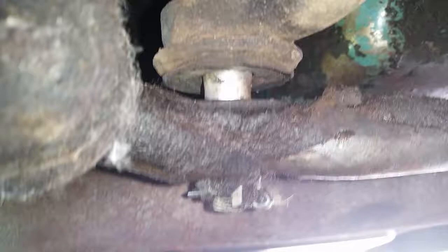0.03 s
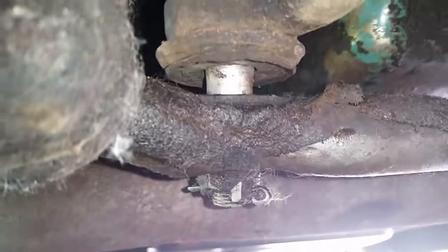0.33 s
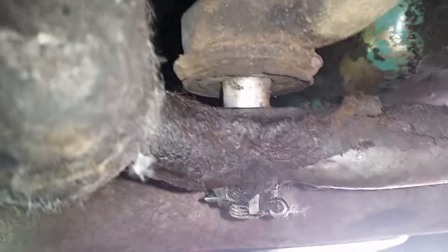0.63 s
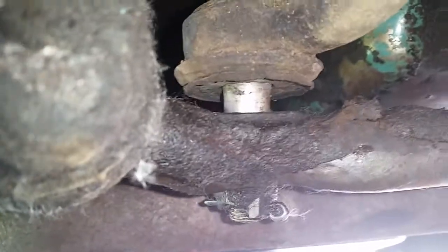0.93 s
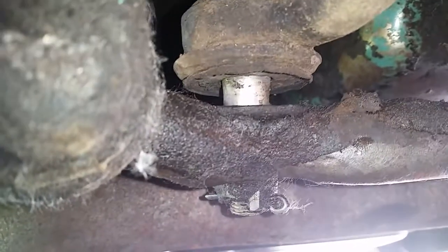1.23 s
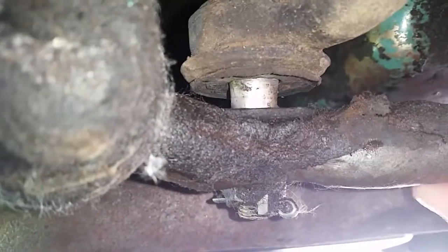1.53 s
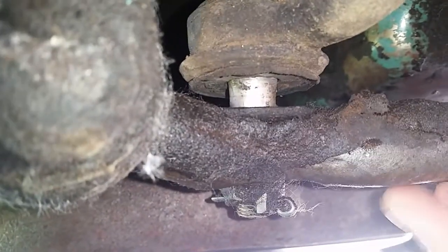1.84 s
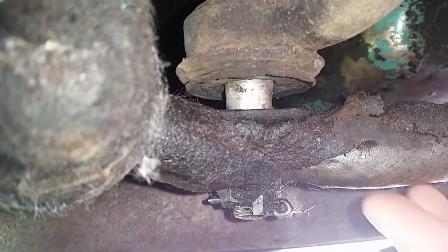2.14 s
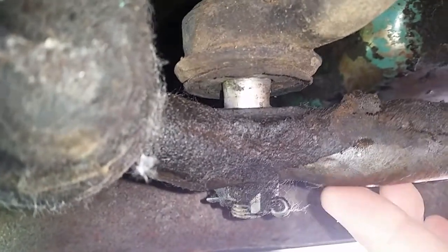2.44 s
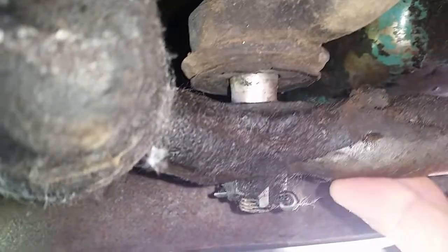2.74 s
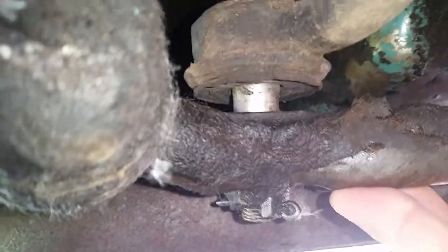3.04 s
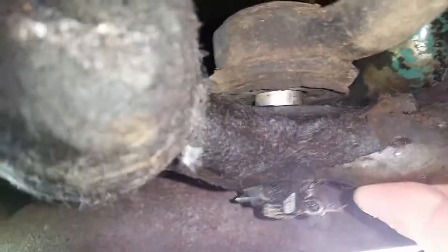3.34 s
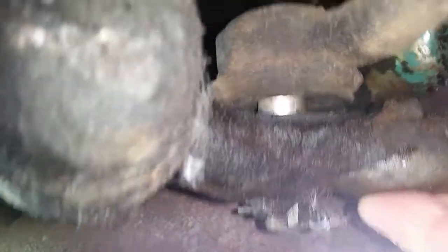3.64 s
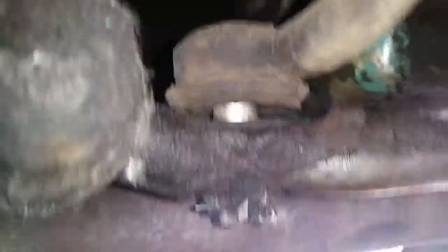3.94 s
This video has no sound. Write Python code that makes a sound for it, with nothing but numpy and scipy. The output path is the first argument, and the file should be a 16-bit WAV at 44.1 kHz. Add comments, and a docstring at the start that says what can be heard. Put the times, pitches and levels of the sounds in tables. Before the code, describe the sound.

A worn metal joint clicks and clunks under a car, with bumps of microphone handling.

```python
"""Under a car, a faint low rumble and hiss fade in. The hand holding the camera rubs, bumps and then
creaks by the left microphone. With a faint rustle and scuffs of grit, a hand reaches in and pushes a worn
steering ball joint. At about 3 s the joint clicks free, then drops into its socket with a clunk: the
impacts excite the modes of the steel, reverberate under the body and set the suspension arm shuddering.
A few lighter knocks and scuffs follow."""
import sys
import numpy as np
from scipy import signal
from scipy.fft import irfft
from scipy.io import wavfile
from scipy.ndimage import uniform_filter1d

SR = 44100
rng = np.random.default_rng(int(sys.argv[2]) if len(sys.argv) > 2 else 0)


def transcribe(u):
    """Save the signal u as a 16-bit wav file named by the first command-line argument.

    u: samples, shape (n,) or (channels, n), limited to [-1, 1]; the rate is SR.
    q: integer samples, one column per channel.
    """
    v = np.clip(np.atleast_2d(u).T, -1, 1)
    q = np.round(v * 32767).astype(np.int16)
    wavfile.write(sys.argv[1], SR, q)


N = 176400
TIME = np.arange(N) / SR


def amp(db):
    """Amplitude ratio of a level in decibels."""
    return 10 ** (np.asarray(db) / 20)


def unit(x):
    """Normalisation to an rms of 1."""
    return x / np.sqrt(np.mean(x ** 2) + 1e-20)


def at_frequency(points, hz):
    """Interpolation of a table on a logarithmic frequency axis."""
    f, value = np.transpose(points)
    return np.interp(np.log(hz + 1), np.log(f + 1), value)


def envelope(points):
    """Amplitude envelope from levels interpolated in decibels."""
    return amp(np.interp(TIME, *np.transpose(points)))


def decay(t, t60):
    """Exponential damping: a fall of 60 dB in t60 seconds."""
    return amp(-60 * t / t60)


def add(mix, start, sound):
    """Superposition of a sound on the mix, from a start in seconds."""
    part = mix[:, round(start * SR):][:, :sound.shape[-1]]
    part += sound[..., :part.shape[-1]]


def noise(spectrum, size=N):
    """Partially coherent noise: the two microphones receive nearly the same bass but unrelated treble."""
    # likeness of the two microphones: f/Hz, correlation (0-1)
    coherence = [(30, 0.4), (70, 0.92), (140, 0.98), (290, 0.64), (640, 0.17), (1400, 0), (15000, 0)]
    hz = np.fft.rfftfreq(size, 1 / SR)
    left, independent = np.exp(2j * np.pi * rng.random((2, len(hz))))
    same = at_frequency(coherence, hz)
    right = same * left + np.sqrt(1 - same ** 2) * independent
    return unit(irfft(np.array([left, right]) * amp(at_frequency(spectrum, hz)), size))


def background():
    """Broadband noise: a low rumble and a faint hiss, with a narrow band of hiss near 4 kHz."""
    # spectra of the rumble and of the left and right hiss: f/Hz, relative density/dB
    rumble_spectrum = [(20, -18), (40, -9), (78, 1.5), (110, -9.5), (140, -2), (170, -13.5), (235, -19),
                       (275, -26), (330, -25.5), (450, -32.5), (700, -28.5), (1000, -33.5), (2000, -48.5),
                       (3500, -63.5), (8000, -90)]
    left_spectrum = [(1500, -2), (3400, 1), (4500, 1), (5200, -5.5), (6200, -24.5), (8000, -13.5),
                     (9500, -14.5), (12000, -0.5), (14500, 1.5)]
    right_spectrum = [(1500, -7.5), (3400, 2), (4500, 2.5), (5200, -2.5), (6200, -10.5), (8000, -6.5),
                      (9500, -14.5), (12000, -3.5), (14500, -1)]
    # rise of the whole background: t/s, gain/dB
    fade_in = [(0, -64.5), (.40, -61), (.435, -16), (.55, -5.5), (.68, 0.5), (1.6, 0.5), (2.3, -0.5),
               (3.2, 1), (3.7, 1.5), (4, 3.5)]
    band_hz, half_width_hz = 3940, 190
    hiss = np.array([amp(-71) * noise(left_spectrum)[0], amp(-73) * noise(right_spectrum)[0]])
    white = rng.standard_normal((2, N)) + 1j * rng.standard_normal((2, N))
    baseband = signal.lfilter(*signal.butter(2, half_width_hz, fs=SR), white)
    narrow_hiss = amp([[-75], [-85]]) * unit((baseband * np.exp(2j * np.pi * band_hz * TIME)).real)
    rumble = amp(-39.5) * noise(rumble_spectrum)
    return (rumble + hiss + narrow_hiss) * envelope(fade_in)


def hand_on_camera():
    """Structure-borne sound: friction noise and soft pressure pulses, mostly in the left microphone."""
    # spectrum of the rubbing: f/Hz, relative density/dB
    rub_spectrum = [(15, -6), (45, -0.5), (90, 5), (170, -3.5), (300, -20.5), (600, -44), (2000, -82.5)]
    # course of the rubbing: t/s, level/dB
    rub_levels = [(0, -100), (.5, -87.5), (.68, -36), (.92, -33), (1.12, -46.5), (1.62, -59.5),
                  (1.76, -16.5), (1.87, -43), (1.97, -37.5), (2.15, -63), (2.45, -51), (2.56, -34),
                  (2.8, -42), (2.93, -34.5), (3.12, -49), (3.6, -60.5), (3.76, -39), (4, -78)]
    # soft bumps of the hand: t/s, peak level/dB, width/s
    bumps = [(0.6973, -17.5, 0.0052), (0.7438, -22.5, 0.0056), (0.7763, -22, 0.011),
             (0.7953, -12.5, 0.0038), (.8263, -12, 0.0049), (0.8757, -25, 0.009), (0.9071, -20.5, 0.0028),
             (0.9138, -28.5, 0.0025), (0.935, -25, 0.0075), (1.028, -18.5, 0.0049), (1.7339, -13, .004),
             (1.7462, -8.5, .0047), (1.7584, -21, .0016), (1.763, -11.5, .0048), (1.7796, -22, .007),
             (1.7972, -18, .0056), (1.9356, -19, 0.0038), (1.9409, -23.5, 0.0027), (2.034, -27.5, 0.01),
             (2.3583, -16, 0.0037), (2.5165, -23, 0.0048), (2.6064, -22.5, 0.0054), (2.623, -24, 0.0072),
             (2.6566, -18.5, 0.0038), (2.7747, -22.5, 0.0064), (2.9084, -20, 0.006), (2.9208, -25.5, .004),
             (2.947, -18.5, 0.0049), (3.0093, -20, 0.0041), (3.0212, -14.5, 0.0047), (3.7342, -27, 0.0057),
             (3.775, -25, 0.0056)]
    out = noise(rub_spectrum)[0] * envelope(rub_levels)
    for centre, db, width in bumps:
        u_squared = np.minimum(((TIME - centre) / width) ** 2, 50)
        out -= amp(db) * (1 - 2 * u_squared) * np.exp(-u_squared)  # a trough between two crests
    return out * amp([[0], [-28.5]])


def grip_creak():
    """Stick-slip friction: each slip is one push and pull that rings the casing; weak slips are duller."""
    # slips of the grip: t/s, level/dB
    slips = [(1.7857, -28.5), (1.8982, -34), (1.9865, -32), (2.2016, -36), (2.8655, -36.5), (3.0003, -31.5),
             (3.083, -19.5), (3.1485, -25.5), (3.216, -27)]
    casing_hz, casing_t60, shortest_s = 640, 0.034, 0.00046
    out, strongest_db = np.zeros(N), max(db for _, db in slips)
    for start, db in slips:
        width = shortest_s * amp(0.16 * (strongest_db - db))  # weaker slips last longer
        u, t = (TIME - start) / width, np.clip(TIME - start, 0, 1)
        pulse = -2 * u * np.exp(-np.minimum(u ** 2, 50))
        ring = amp(-23) * np.sin(2 * np.pi * casing_hz * t) * decay(t, casing_t60)
        out += amp(db) * (pulse - ring)
    return out * amp([[0], [-20]])


def rustle():
    """Amplitude-modulated noise: a faint, uneven rustle as the hand reaches in and pushes."""
    # spectrum of the rustle: f/Hz, relative density/dB
    spectrum = [(200, -1.5), (2000, 3.5), (6000, -1), (7400, -4), (9000, 2.5), (11000, -2.5), (14500, -2)]
    # course of the rustle: t/s, level/dB
    levels = [(0, -130), (2.1, -100), (2.45, -85), (3.1, -75), (3.65, -83.5), (3.8, -75.5), (4, -74.5)]
    flutter_db = 1.5 * unit(uniform_filter1d(rng.standard_normal(N), size=800))
    return noise(spectrum) * envelope(levels) * amp(flutter_db)


def grit_scuffs():
    """Friction noise of grit: a wide band is heard as a scrape, a narrow one as a squeak."""
    # light scuffs: t/s, level/dB, centre f/Hz, half width/octaves, t60/s
    scuffs = [(2.668, -66, 9000, 1.5, .08), (2.724, -70.5, 7500, .6, 0.11), (3.099, -60.5, 5500, 1.8, .05),
              (3.230, -65.5, 8960, .08, 0.039), (3.728, -59, 9100, 0.047, 0.033),
              (3.806, -58, 3420, 0.9, 0.078), (3.933, -66, 8900, .07, .04)]
    rise_s = 0.0026
    out, t = np.zeros((2, N)), TIME[:8192]
    hz = np.geomspace(100, SR / 2, 200)
    for start, db, centre_hz, octaves, t60 in scuffs:
        band = np.c_[hz, -20 * np.log10(1 + (np.log2(hz / centre_hz) / octaves) ** 2)]
        shape = np.minimum(t / rise_s, 1) * decay(t, t60)
        add(out, start, amp(db) * noise(band, len(t)) * shape)
    return out


def underbody_reverb(sound):
    """Reverberation: dense reflections between ground and underbody, lasting longest in the bass."""
    # reverberation time under the car: f/Hz, t60/s
    reverb_times = [(150, 0.81), (700, 0.33), (2000, 0.35), (5000, 0.4), (12000, 0.36)]
    build_up_s = 0.0061
    hz, t, bands = signal.stft(rng.standard_normal((2, SR // 2)), SR, nperseg=256)
    t60 = at_frequency(reverb_times, hz)[:, None]
    tail = signal.istft(bands * decay(t, t60), SR, nperseg=256)[1]
    tail *= np.minimum(TIME[:tail.shape[1]] / build_up_s, 1)
    return signal.fftconvolve(sound, tail / np.linalg.norm(tail[0]), axes=1)[:, :N]


def ball_joint():
    """Impact excitation: each contact gives a dull crack, a bright snap and a damped modal ring."""
    # modes of the steel joint and arm: f/Hz, relative level/dB
    modes = [(296, -14), (535, -7), (601, -3), (662, -2), (745, -2), (882, -2), (1212, -9), (1285, -18),
             (1406, -17), (1560, -17), (1663, -15), (1715, -12), (1793, -19), (2053, -19), (2344, -21),
             (2756, -28), (3150, -33)]
    # contacts: t/s, crack/dB, ring/dB, snap/dB, crack t60/s, low-pass f/Hz, left over right/dB
    contacts = [(3.0408, -27, -48, -47.5, 0.06, 1840, -2.5), (3.0555, -44, -58, -71, .04, 1500, -0.5),
                (3.3059, -29.5, -42.5, -62.5, .05, 9000, -3.5), (3.3100, -24.5, -29, -81, 0.059, 7000, -1),
                (3.3146, -27, -34.5, -72, 0.057, 7000, 1), (3.3184, -24.5, -29, -82.5, .055, 5500, 0.5),
                (3.3225, -27.5, -38, -80.5, .07, 3500, 0), (3.5290, -31, -46, -90, .045, 900, -3),
                (3.6880, -44, -64, -87, 0.029, 795, 0), (3.8090, -43, -63, -59.5, 0.062, 4060, 0)]
    # spectra of the crack and the snap: f/Hz, relative density/dB
    crack_spectrum = [(60, -19.5), (200, 2.5), (430, -6), (600, 1), (900, 0.5), (1100, -13.5),
                      (1700, -12.5), (2400, -20.5), (3000, -25), (4500, -32.5), (6500, -42.5), (8000, -76)]
    snap_spectrum = [(300, -21.5), (1000, 9), (2000, 3), (4000, 4.5), (6200, -8.5), (9500, 3), (11500, -17),
                     (14500, -2)]
    ring_t60, snap_t60, attack_s, stereo_spread_rad = 0.096, 0.07, 0.00042, 1.18
    out, t = np.zeros((2, N)), TIME[:16384]
    attack = 1 - np.exp(-(t / attack_s) ** 2)
    for start, crack_db, ring_db, snap_db, crack_t60, cutoff_hz, pan_db in contacts:
        phases = rng.uniform(0, 2 * np.pi, (len(modes), 1, 1))
        phases = phases + stereo_spread_rad * rng.standard_normal((len(modes), 2, 1))
        tones = sum(amp(db) * np.sin(2 * np.pi * hz * t + p) for (hz, db), p in zip(modes, phases))
        ring = amp(ring_db) * tones * decay(t, ring_t60)
        crack = amp(crack_db) * noise(crack_spectrum, len(t)) * decay(t, crack_t60)
        snap = amp(snap_db) * noise(snap_spectrum, len(t)) * decay(t, snap_t60)
        lowpass = signal.butter(2, cutoff_hz, fs=SR)
        knock = signal.lfilter(*lowpass, (crack + ring) * attack) + snap * attack
        add(out, start, knock * amp([[pan_db / 2], [-pan_db / 2]]))
    return out


def arm_shudder():
    """Damped vibration: the heavy arm's low tones waver in amplitude and phase over a rough thud."""
    # vibrations of the arm: t/s, f/Hz, level/dB, attack/s, hold/s, release t60/s
    vibrations = [(3.3235, 114, -16.5, 0.0077, 0.0068, 0.017), (3.3425, 122.5, -22, .009, 0.073, 0.18),
                  (3.47, 82, -30.5, 0.015, 0.026, 0.47), (3.385, 342, -40.5, .012, 0.036, 0.24)]
    # spectrum of the thud: f/Hz, relative density/dB
    thud_spectrum = [(50, -25.5), (130, -0.5), (190, -6), (300, 1), (420, -18.5), (900, -40), (3000, -92)]
    wobble_depth, drift_rad, pan_db = 0.26, 0.39, 2
    thud_start_s, thud_rise_s = 3.318, 0.00598
    out, t = np.zeros((2, N)), TIME[:32768]
    for start, hz, db, attack, hold, t60 in vibrations:
        wobble = noise(spectrum=[(5, -9), (40, 5), (120, -18.5), (500, -89.5)], size=len(t))
        rise = np.sin(np.pi / 2 * np.minimum(t / attack, 1)) ** 2
        release = decay(np.maximum(t - attack - hold, 0), t60)
        tone = np.sin(2 * np.pi * hz * t + drift_rad * wobble[0, ::-1])
        add(out, start, amp(db) * rise * release * (1 + wobble_depth * wobble) * tone)
    thud_shape = np.minimum(t / thud_rise_s, 1) * decay(t, t60=0.24)
    add(out, thud_start_s, amp(-26) * noise(thud_spectrum, len(t)) * thud_shape)
    return out * amp([[pan_db / 2], [-pan_db / 2]])


def scene():
    """Superposition of all the sources; only the joint and the grit reverberate."""
    direct = ball_joint() + grit_scuffs()
    reflected = amp(-10) * underbody_reverb(direct)
    return direct + reflected + arm_shudder() + hand_on_camera() + grip_creak() + rustle() + background()


def record(dry):
    """Band limiting: a linear-phase low-pass filter removes the highest treble."""
    cutoff_hz = 14650
    lowpass = signal.firwin(511, cutoff_hz, window=("kaiser", 9), fs=SR)
    return signal.oaconvolve(dry, lowpass[None], "same")


dry = scene()
out = record(dry)
transcribe(out)
```